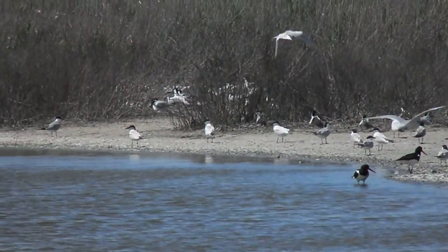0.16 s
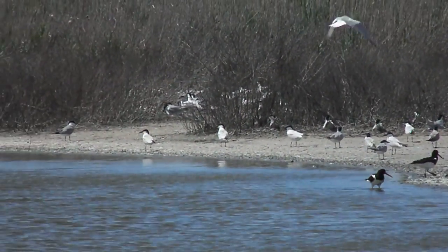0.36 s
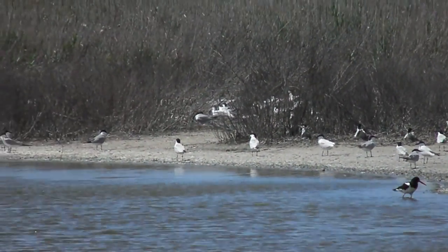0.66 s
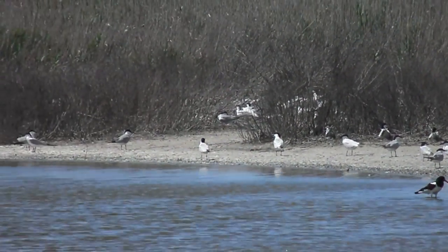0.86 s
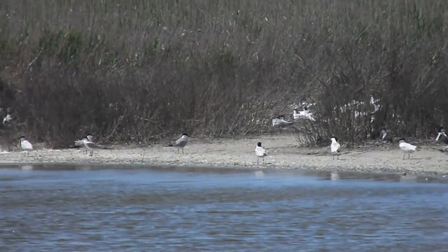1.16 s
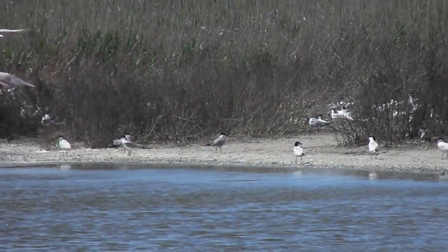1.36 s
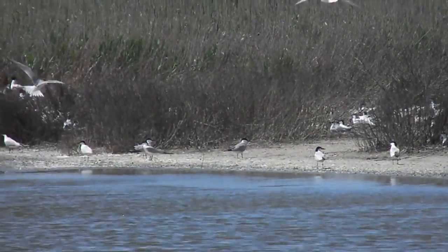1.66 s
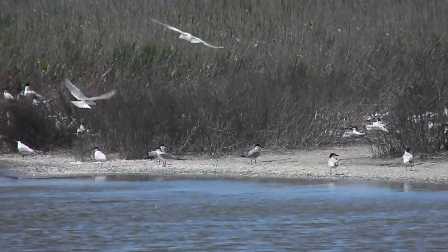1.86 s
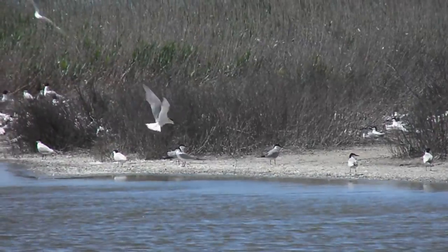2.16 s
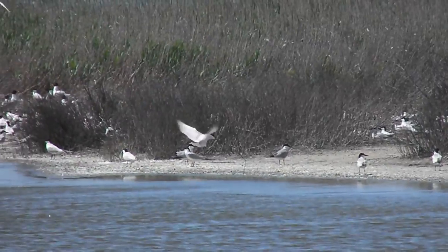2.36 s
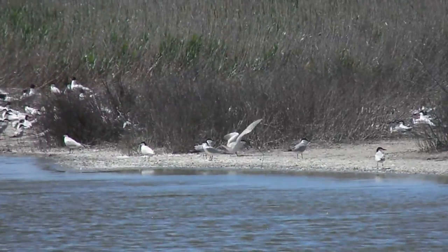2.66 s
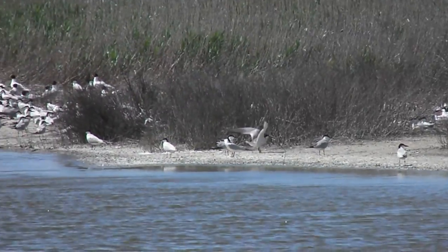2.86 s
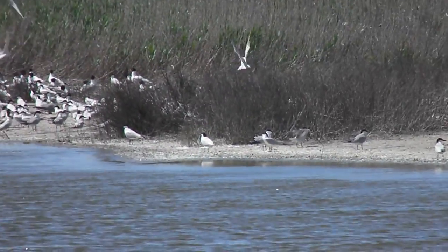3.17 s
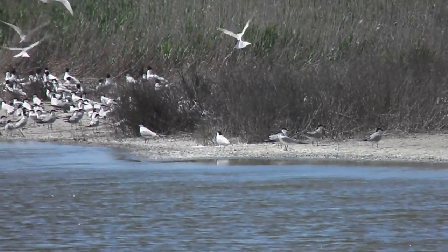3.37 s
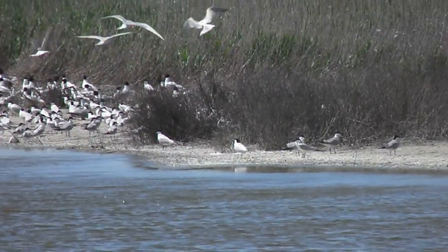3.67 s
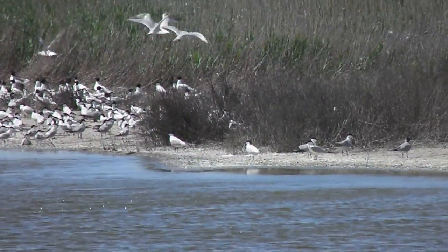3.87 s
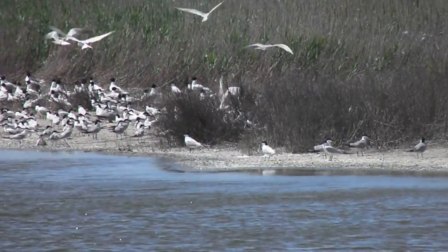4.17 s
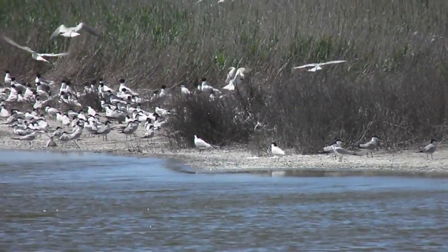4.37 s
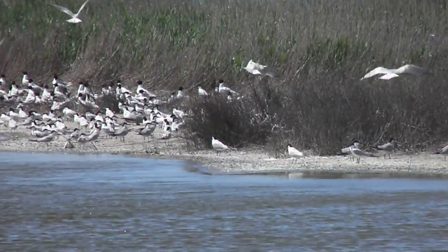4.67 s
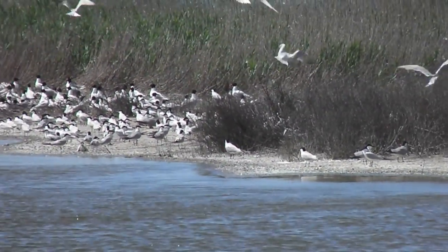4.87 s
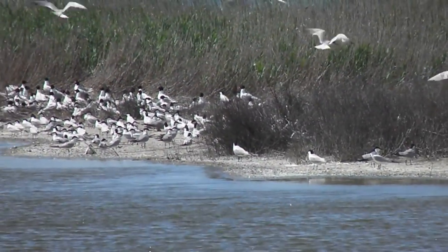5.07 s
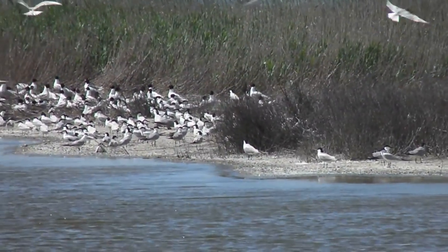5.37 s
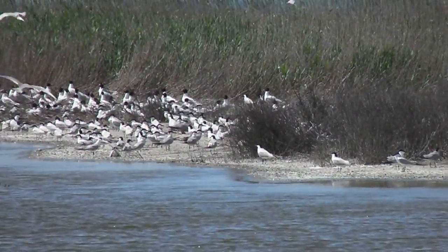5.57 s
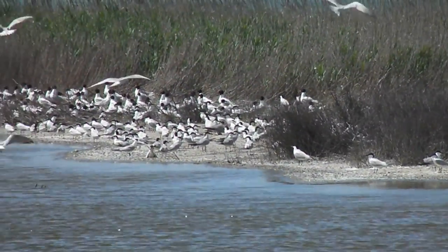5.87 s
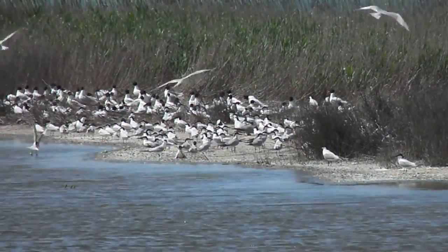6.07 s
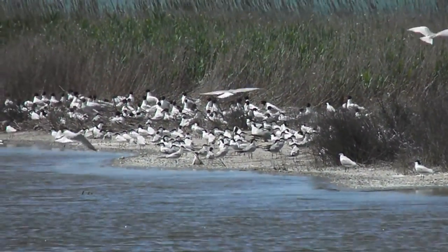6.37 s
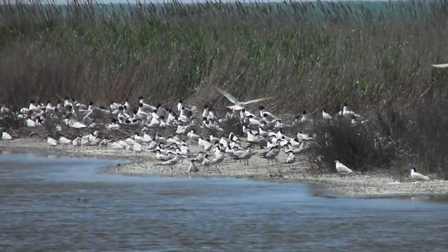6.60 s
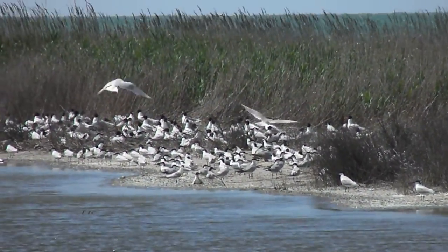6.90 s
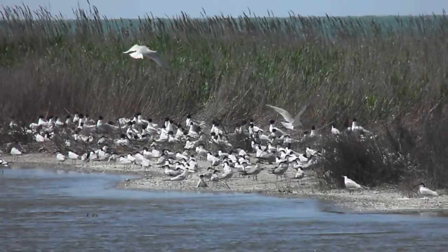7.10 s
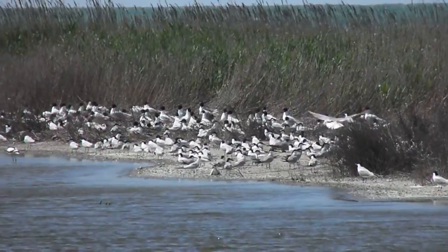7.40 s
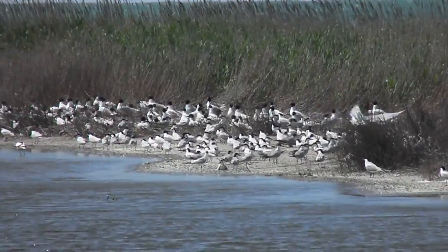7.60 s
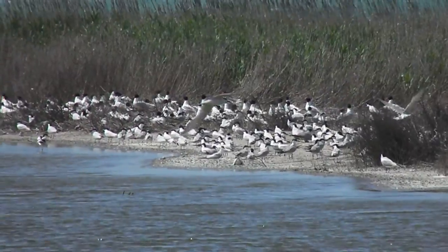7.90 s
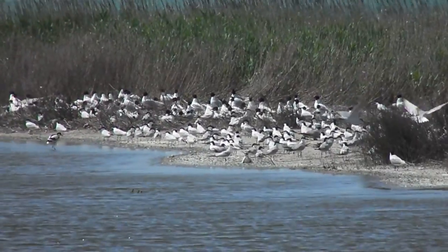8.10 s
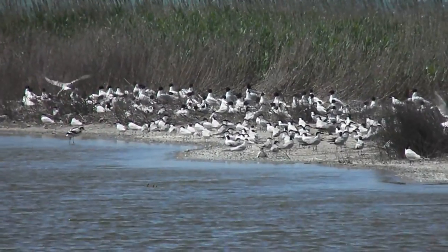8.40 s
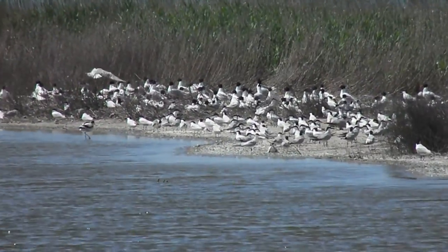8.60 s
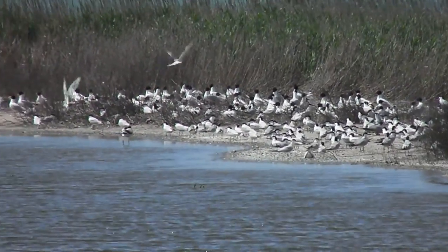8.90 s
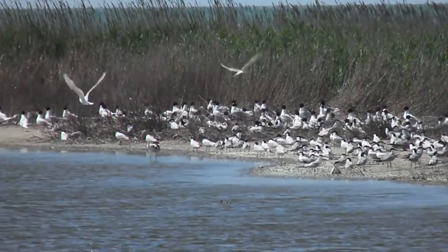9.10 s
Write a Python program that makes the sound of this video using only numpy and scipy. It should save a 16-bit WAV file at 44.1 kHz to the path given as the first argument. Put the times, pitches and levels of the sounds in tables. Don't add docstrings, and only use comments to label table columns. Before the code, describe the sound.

Piping waders, yelping gulls and hundreds of blurred distant birds call nonstop while wind rumbles and pops hard against a small camera microphone.

```python
import sys
import numpy as np
from scipy import signal
from scipy.fft import rfft, irfft, next_fast_len
from scipy.io import wavfile
from scipy.ndimage import uniform_filter1d

SR = 44100
rng = np.random.default_rng(int(sys.argv[2]) if len(sys.argv) > 2 else 0)


def generate_wav(sig):
    pcm = np.round(np.clip(np.atleast_2d(sig).T, -1, 1) * 32767).astype(np.int16)
    wavfile.write(sys.argv[1], SR, pcm)


def linear_from_db(decibels):
    return 10 ** (np.asarray(decibels, float) / 20)


N = 407925


def evened(x):
    return x / np.sqrt(np.mean(x ** 2) + 1e-20)


def read(points, hz):
    f, value = np.transpose(points)
    return np.interp(np.log(hz + 1), np.log(f + 1), value)


def add(mix, s, sound):
    part = mix[max(round(s * SR), 0):][:len(sound)]
    part += sound[:len(part)]


def colour(x, points):
    size = next_fast_len(len(x))
    gain = linear_from_db(read(points, np.fft.rfftfreq(size, 1 / SR)))
    return irfft(rfft(x, size) * gain, size)[:len(x)]


def drift(size, span):
    return evened(uniform_filter1d(uniform_filter1d(rng.standard_normal(size), span), span))


def eddies():
    # t/s, peak level/dB
    singles = [(.078, -8), (.153, -8), (.5, -7), (.522, -11), (.565, -8.5), (1.24, -10.5), (1.682, -4.5),
               (1.723, -6), (2.781, -7), (3.513, -7), (3.596, -7.5), (3.67, -6.5), (3.716, -9), (3.779, -7.5),
               (3.941, -10), (4.677, -15), (4.689, -7), (5.255, -8), (5.278, -8), (5.414, -9), (5.483, -3.5),
               (5.515, -9), (6.8, -3), (6.811, -15), (6.84, -6.5), (7.278, -4.5), (7.334, -5.5),
               (7.347, -9.5), (8.171, -7), (8.949, -9.5),
               (0.042, -16), (0.055, -11.5), (.186, -12.5), (0.439, -12.5), (.612, -16.5), (.662, -14.5),
             (1.125, -17.5), (2.036, -13), (2.382, -11), (2.464, -10.5), (2.96, -14.5), (3.104, -14.5),
             (3.263, -11.5), (3.293, -13), (4.04, -15), (4.116, -14.5), (5.796, -15), (6.683, -13.5),
             (6.898, -13), (7.164, -16.5), (7.29, -9), (7.586, -12), (7.643, -15), (7.754, -14),
             (7.79, -14), (8.069, -11), (8.235, -14), (8.578, -11.5), (8.828, -12), (1.743, -16.5),
             (6.772, -20), (6.883, -20), (6.933, -20), (7.21, -17.5), (.093, -20.5), (.132, -19),
             (.424, -17.5), (.448, -18), (.58, -13), (.59, -15), (2.936, -19), (0.708, -22), (1.102, -26),
             (1.499, -21), (1.664, -10.5), (1.796, -15.5), (1.98, -21), (2.55, -17.5), (2.56, -17),
             (3.064, -16), (3.444, -12), (3.468, -12.5), (3.496, -9.5), (3.579, -12.5), (3.887, -21),
             (3.967, -17.5), (5.33, -13), (5.44, -13), (6.129, -18.5), (6.582, -18.5), (7.118, -19.5),
             (7.52, -20.5), (7.902, -19.5), (8.979, -17.5)]
    # t/s, length/s, peak level/dB
    flurries = [(0.481, .03, -16), (0.541, .03, -9.5), (1.611, .035, -13.5), (2.064, .045, -14.5),
                (3.299, .035, -17), (3.546, .04, -18.5), (3.626, .135, -14), (3.915, .055, -15),
                (5.217, .03, -13.5), (5.305, .01, -11.5), (5.374, .04, -13), (6.664, .06, -16.5),
                (8.159, .035, -10.5), (8.59, .06, -15.5), (9.089, .075, -16)]
    gap_s, scatter, spread_db = .02, .4, 2.
    rows = singles
    order = np.arange(8)
    for (s, length, db), (late, loud) in zip(flurries, rng.standard_normal((len(flurries), 2, 8))):
        after = gap_s * (order + scatter * np.clip(late, -1, 1) * (order > 0))
        rows = rows + [(s + a, db + spread_db * b) for a, b in zip(after, loud) if a < length]
    return rows


def gustiness(pops):
    train = np.zeros(N)
    train[(np.transpose(pops)[0] * SR).astype(int)] = SR / 14
    smooth = uniform_filter1d(uniform_filter1d(train, SR // 7), SR // 14)
    return np.minimum(smooth, 1)


def wind(pops, ride_db):
    # t/s, level/dB
    breeze = [(0.0, -42.5), (0.15, -40.5), (1.05, -40.5), (1.3, -36), (1.9, -37), (2.42, -35),
              (2.78, -39.5), (3.68, -35), (4.4, -42), (4.8, -36.5), (5.309, -37.5), (6.34, -37.5),
              (6.83, -36.5), (8.32, -37.5), (9.25, -35.5)]
    # f/Hz, level/dB
    rumble = [(20, -40), (40, -10.5), (93, -5), (250, 0.5), (600, -11.5), (1200, -30), (3000, -55),
              (15000, -43.5)]
    # f/Hz, level/dB
    gust = [(30, -29), (100, -14), (206, 0.5), (458, 1), (1000, -15.5), (1890, -30.5), (3000, -47.5),
            (8000, -65.5), (15000, -74)]
    ride = .75
    strength_db = np.interp(np.arange(N) / SR, *np.transpose(breeze)) + 6.3 * gustiness(pops)
    lumpy_noise = rng.standard_normal(N) * linear_from_db(5.2 * drift(N, 200))
    mix = linear_from_db(strength_db + .5) * evened(colour(lumpy_noise, rumble))
    t = np.arange(-.02, .03, 1 / SR)
    wake = np.exp(-(t / np.where(t < 0, .005, .012)) ** 2)
    shape = np.exp(-(t / .0013) ** 2) + .28 * wake
    fade = signal.windows.tukey(len(t), .2)
    for s, db in pops:
        tilt = .36 * (db + 15)
        tilted = [(f, level + tilt * np.log2(f / 450)) for f, level in gust]
        pop = colour(shape * rng.standard_normal(len(t)), tilted)
        peak = linear_from_db(db - .05 - ride * ride_db[round(s * SR)])
        add(mix, s + t[0], peak * pop / abs(pop).max() * fade)
    return mix * linear_from_db(ride * ride_db)


def gain_db(pops):
    # t/s, gain lost/dB
    shoves = [(.091, 6.5), (.167, 6), (.195, 9.5), (.455, 15.5), (.568, 20.5), (2.1, 13.5), (2.788, 8),
              (2.956, 10.5), (3.103, 11.5), (3.212, 18.5), (3.455, 9.5), (3.689, 22.5), (3.808, 17.5),
              (3.944, 14.5), (5.293, 19), (5.421, 6), (6.633, 10), (6.743, 21.5), (6.919, 10),
              (7.135, 10.5), (7.198, 13), (7.649, 8.5), (7.734, 18), (7.84, 8.5), (7.925, 10.5),
              (8.247, 12.5), (8.596, 18.5), (8.987, 4), (9.057, 10.5), (9.154, 2)]
    trip_db, squeeze, react_s, recover_db_per_s = -24, .71, .0047, 114.5
    lost = np.zeros(N)
    drops = [(s + react_s, squeeze * (db - trip_db)) for s, db in pops]
    for s, db in [*shoves, *drops]:
        lost[round(s * SR)] = db
    climb = np.arange(N) * recover_db_per_s / SR
    return -uniform_filter1d(np.maximum.accumulate(lost + climb) - climb, size=120)


def shore(x, t60=.25):
    t = np.arange(SR // 3) / SR
    sparse = rng.standard_normal(len(t)) * (rng.random(len(t)) < .05)
    taps = sparse * linear_from_db(-60 * t / t60) * (t > .004)
    return signal.oaconvolve(x, taps / np.linalg.norm(taps))[:N]


def gull(s, rise, first_hz, top_hz, db, throat_hz, rough=.2):
    # f/Hz, level/dB
    throat = [(800, -7), (1400, -3), (2400, 0), (5300, -3), (7000, -10), (10000, -26), (13000, -50)]
    onset_s, fall_s, fall_to = .012, .0181, .7
    end = rise + fall_s
    t = np.arange(-onset_s, end, 1 / SR)
    hz = np.interp(t, [-onset_s, 0, rise, rise + fall_s / 3, end],
                   [.88 * first_hz, first_hz, top_hz, top_hz * .97, fall_to * top_hz])
    hz = uniform_filter1d(hz, 350, mode="nearest") * (1 + .004 * drift(len(t), 300))
    k = np.arange(1, 12)[:, None]
    near_db = np.maximum(-7 * ((k * hz / throat_hz - 1) / .4) ** 2, -27)
    levels = linear_from_db(read(throat, k * top_hz) + near_db + 1.8 * rng.standard_normal(k.shape))
    turns = k * np.cumsum(hz) / SR + rng.random(k.shape)
    cry = evened((levels * np.sin(2 * np.pi * turns)).sum(0))
    cry = cry * (1 + rough * drift(len(t), 40)) * linear_from_db(1.5 * drift(len(t), 500))
    effort_db = np.interp(t, [-onset_s, 0, rise, end], [-18, -5, 1.5, -7])
    return s + t[0], linear_from_db(db + effort_db) * cry * signal.windows.tukey(len(t), .15)


def colony(count=360):
    # f/Hz, level/dB
    blur_curve = [(400, -8), (820, 3), (1160, -6.5), (1630, -4.5), (2480, 0), (3310, -12.5), (4780, -7),
                  (7000, -14.5), (10000, -20), (16000, -32)]
    mix = np.zeros(N)
    for when, long, high, climb, near, deep, tern in rng.random((count, 7)):
        hz = (640 + 320 * high) * (2 if tern > .8 else 1)
        rise = .008 + .035 * long ** 2
        top_hz = hz * (.94 + .22 * climb)
        throat_hz = 1900 + 1700 * deep ** 2
        add(mix, *gull(when * N / SR, rise, hz, top_hz, 4 * near, throat_hz, .15 + .3 * long))
    cries = evened(mix + linear_from_db(-11) * shore(mix, .2))
    blur = evened(colour(rng.standard_normal(N), blur_curve)) * linear_from_db(2.5 * drift(N, 700))
    return linear_from_db(-42) * (cries + linear_from_db(-1.5) * blur)


def slur(rows):
    s, hz, db = np.transpose(rows)
    t = np.arange(s[0], s[-1], 1 / SR)
    turn = 2 * np.pi * np.cumsum(uniform_filter1d(np.interp(t, s, hz), 200)) / SR
    tone = np.sin(turn) + linear_from_db(-17) * np.sin(2 * turn)
    level = linear_from_db(np.interp(t, s, db) + 1.7 * drift(len(t), 80))
    return s[0], level * tone * signal.windows.tukey(len(t), .15)


def buzzes(pops):
    # f/Hz, level/dB
    buzz_curve = [(2400, -4), (4800, 4), (9600, 0), (14400, -9)]
    t = np.arange(0, .004, 1 / SR)
    mix = np.zeros(N)
    lines = 2400 * np.arange(1, 7)[:, None]
    fade = signal.windows.tukey(len(t), .6)
    for (s, db), (late, loud, *phases) in zip(pops, rng.random((150, 8))):
        waves = np.sin(2 * np.pi * (lines * t + np.c_[phases]))
        buzz = (linear_from_db(read(buzz_curve, lines)) * waves).sum(0)
        add(mix, s + .013 * late, linear_from_db(-72 + 26 * loud ** 2) * buzz * fade)
    return mix


def kip(s, db):
    t = np.arange(0, .055, 1 / SR)
    hz = 2384 * np.interp(t, [0, .006, .03, .055], [.85, 1, .98, .9])
    turn = 2 * np.pi * np.cumsum(hz) / SR
    tone = np.sin(turn) + np.sin(2 * turn) + linear_from_db(-10) * np.sin(3 * turn)
    effort_db = np.interp(t, [0, .008, .03, .055], [31, 26, 18, 5.4])
    return s, linear_from_db(db + effort_db) * tone * signal.windows.tukey(len(t), .2)


def peep(s, top_hz, db, over_db):
    # t/s from its highest pitch, pitch factor, tone level/dB, overtone level/dB
    course = [
        (-.016, .7, -11, -28),
        (-.009, .93, -3.5, 4.5),
        (-.006, .985, -1.5, 0.5),
        (0, 1, 1, 6),
        (.006, .965, 5, -0.5),
        (.014, .86, 2, -16),
        (0.025, .77, 0, -22),
        (.042, .68, -8.5, -53),
        (.056, .66, -26, -65),
    ]
    late_s = .003
    when, *columns = np.transpose(course)
    t = np.arange(when[0], when[-1], 1 / SR)
    factor, tone_db, bright_db = (uniform_filter1d(np.interp(t, when, c), 120) for c in columns)
    turn = 2 * np.pi * np.cumsum(top_hz * factor) / SR
    third = linear_from_db(-9 - .76 * bright_db) * np.sin(3 * turn)
    overtones = np.sin(2 * turn) + third + linear_from_db(-21) * np.sin(4 * turn)
    halves = linear_from_db(-5) * np.sin(turn * 3 / 2) + np.sin(turn * 5 / 2)
    halves = linear_from_db(-3) * halves * np.exp(-((t + .007) / .005) ** 2)
    breath = np.diff(uniform_filter1d(rng.standard_normal(len(t) + 1), 5))
    breath = breath * np.exp(-((t + .016) / .003) ** 2)
    flutter = linear_from_db(1.4 * drift(len(t), 60))
    sound = linear_from_db(tone_db) * np.sin(turn) + linear_from_db(over_db + bright_db) * (overtones + halves)
    sound = sound + linear_from_db(-6) * breath
    return s + when[0] + late_s, linear_from_db(db + 5) * flutter * sound


def rasp(s, length, per_s, db):
    # f/Hz, level/dB
    scrape = [(1400, -20), (2100, -1), (2800, -1.5), (3400, -8), (5000, -13.5), (8000, -30.5)]
    t = np.arange(0, length, 1 / SR)
    pulses = np.exp(-((per_s * t + .08 * drift(len(t), 300)) % 1) / .35)
    sound = evened(colour(pulses * rng.standard_normal(len(t)), scrape))
    return s, linear_from_db(db) * sound * signal.windows.tukey(len(t), .4)


def trill(s, length, first_hz, last_hz, per_s, db):
    t = np.arange(0, length, 1 / SR)
    notes = np.clip(np.sin(2 * np.pi * per_s * t) + .3, 0, 1)
    turn = 2 * np.pi * np.cumsum(np.linspace(first_hz, last_hz, len(t))) / SR
    return s, linear_from_db(db + 2 * drift(len(t), 900)) * notes * np.sin(turn) * signal.windows.tukey(len(t), .2)


def near_birds():
    # t/s, f/Hz, level/dB
    slurs = [
        [(0, 2800, -25.5), (.035, 2046, -41.5), (.1, 2740, -35.5), (.125, 2360, -43)],
        [(.43, 2350, -45), (.455, 2300, -46), (.485, 1980, -44)],
        [(.505, 3150, -42), (.525, 3280, -46), (.56, 3080, -43), (.6, 3300, -45)],
        [(1.825, 2500, -38), (1.845, 2342, -34), (1.87, 1970, -38)],
        [(1.4, 3250, -26), (1.425, 2480, -25), (1.47, 2290, -28), (1.54, 2204, -30)],
        [(5.49, 2580, -27), (5.51, 2400, -37), (5.555, 2240, -34)],
        [(6.415, 3150, -29), (6.43, 3215, -37), (6.465, 2400, -25.5)],
        [(2.865, 2214, -31), (2.877, 2470, -37), (2.928, 1510, -45)],
        [(2.8, 2230, -42), (2.814, 2750, -40), (2.85, 2050, -44)],
        [(2.51, 2260, -40), (2.525, 2560, -32), (2.562, 2140, -50)],
        [(2.6, 1575, -43), (2.65, 1950, -29), (2.69, 2130, -38)],
        [(4.78, 1870, -44), (4.797, 2460, -28.5), (4.835, 1800, -38)],
        [(4.445, 2800, -43), (4.47, 3060, -32), (4.492, 2800, -36)],
        [(6.225, 2420, -49), (6.315, 2738, -53), (6.33, 2400, -46)],
        [(.925, 2590, -32), (.97, 2400, -32), (1.0, 2140, -24)],
        [(8.24, 2490, -53), (8.285, 2730, -32), (8.3, 2560, -34)],
        [(8.27, 1539, -49), (8.32, 2103, -27), (8.337, 1786, -40)],
    ]
    # t/s, level/dB
    kips = [
        (.118, -64),
        (.675, -59.5),
        (1.228, -59),
        (1.814, -63.5),
        (2.368, -66),
        (3.49, -69),
        (8.768, -69),
    ]
    # t/s of highest pitch, highest f/Hz, level/dB, overtone level/dB
    peeps = [(0.279, 3450, -23, -21), (1.131, 3450, -29, -13), (1.365, 3434, -29, -12),
             (1.628, 3450, -38.5, -1), (1.923, 3430, -28, -11.5), (2.202, 3440, -36.5, -7),
             (4.403, 3500, -26.5, -11.5), (4.975, 3460, -27, -15.5), (5.274, 3500, -36.5, -7.5),
             (5.571, 3480, -29, -9), (5.827, 3510, -35.5, -13.5), (6.091, 3490, -30, -4),
             (6.354, 3430, -32, -8), (6.608, 3520, -36, -4.5), (6.656, 3310, -42, -10),
             (6.852, 3575, -43, -15), (7.094, 3510, -37, -4), (7.337, 3480, -34, -6.5),
             (7.581, 3440, -35, -13.5), (7.824, 3420, -40.5, -13), (8.08, 3484, -32, -13),
             (8.328, 3513, -23.5, -9.5), (8.577, 3487, -27.5, -6.5), (9.133, 3380, -38.5, -11),
             (.607, 3380, -38.5, -15), (0.882, 3407, -27.5, -11), (2.499, 3400, -45.5, -3.5),
                 (2.817, 3240, -38.5, -16), (3.136, 3192, -30.5, -16), (3.454, 3270, -37.5, -34),
                 (3.774, 3350, -40.5, -13), (4.107, 3270, -30, -20.5), (4.139, 3367, -40, -14),
                 (4.351, 3140, -32, -18), (4.678, 3150, -34, -12), (4.684, 3490, -33.5, -28),
                 (5.722, 3350, -37, -6.5), (5.935, 3260, -36.5, -7), (6.176, 3320, -35, -9),
                 (7.399, 3250, -42, -8.5), (7.957, 3280, -41, -19), (8.464, 3300, -31, -8),
                 (8.697, 3196, -31, -17), (8.856, 3274, -27, -10), (8.976, 3284, -41.5, -5.5)]
    # t/s, length/s, pulses per s, level/dB
    rasps = [(.305, 0.057, 90, -35), (6, .055, 77, -33.5), (5.63, .07, 65, -37), (5.2, .045, 120, -31),
             (8.54, 0.0417, 77, -29), (8.42, .04, 110, -33), (7.1, .05, 90, -36)]
    # t/s, length/s, first f/Hz, last f/Hz, notes per s, level/dB
    trills = [
        (1.157, 0.63, 2730, 2960, 63, -32.5),
        (2.655, 0.128, 3650, 3620, 44, -38),
        (5.068, 0.49, 2875, 2950, 49, -39.5),
    ]
    # t/s, length of the rise/s, top f/Hz, level/dB
    wails = [(1.975, .075, 1730, -39), (2.898, 0.096, 1720, -43.5), (6.225, 0.068, 1515, -43),
             (6.376, 0.054, 910, -29), (0.8, .065, 1670, -42.5), (4.906, 0.053, 1600, -33),
             (8.428, .012, 1835, -34), (8.476, .024, 1610, -36.5), (10, .012, 1840, -29.5),
             (.635, .055, 1680, -47)]
    mutters = [(1.76, 0.043, 880, -39), (2.13, 0.051, 848, -37), (2.293, 0.013, 840, -28.5),
               (4.42, 0.019, 810, -36), (4.495, 0.019, 820, -34), (2.96, 0.029, 827, -42),
               (3.0, .045, 846, -31), (3.08, .048, 928, -35.5), (4.04, 0.09, 795, -38.5),
               (4.19, .025, 830, -31), (4.285, 0.066, 931, -29.5), (4.535, 0.029, 888, -31),
               (5.612, .012, 980, -36), (5.697, 0.016, 961, -26.5), (5.98, 0.083, 828, -42)]
    yaps = [(2.205, .02, 865, -37), (2.33, 0.032, 930, -37), (2.602, .017, 920, -36),
            (2.652, .022, 950, -34.5), (2.7, 0.033, 905, -33), (2.865, .012, 815, -35),
            (5.845, .05, 930, -39), (8.385, .014, 845, -32)]
    yelps = [(1.489, 0.024, 864, -34.5), (2.021, 0.0086, 860, -31.5), (4.19, 0.011, 918, -47),
             (6.495, 0.013, 878, -31), (6.565, 0.015, 770, -34.5), (6.648, 0.0099, 748, -39),
             (7.185, .035, 930, -50), (7.07, 0.034, 963, -42), (7.43, .048, 885, -37.5)]
    shrieks = [
        (6.945, .065, 940, -40),
        (1.375, 0.051, 1022, -39),
        (3.239, 0.063, 1003, -37),
        (3.355, 0.042, 916, -33),
        (.312, 0.018, 1100, -38),
    ]
    mix = np.zeros(N)
    for voice, rows in ((peep, peeps), (kip, kips), (trill, trills), (rasp, rasps)):
        for row in rows:
            add(mix, *voice(*row))
    for s, rise, top_hz, db in wails:
        add(mix, *gull(s, rise, top_hz * .95, top_hz, db, 4140))
    for rows, throat_hz in ((mutters, 2070), (yaps, 2500), (yelps, 3150), (shrieks, 4700)):
        for s, rise, top_hz, db in rows:
            first_hz = top_hz * (.93 - 1.2 * rise)
            add(mix, *gull(s, rise, first_hz, top_hz, db, throat_hz))
    for rows in slurs:
        add(mix, *slur(rows))
    return mix + linear_from_db(-16) * shore(mix, .13)


def scene():
    # t/s, level/dB
    clamour = [(0, 1), (.35, 2.5), (0.799, 6.5), (1.5, 5), (2.0, 6.5), (2.5, 2.5), (3.049, 5.5), (3.4, 2),
               (3.7, 1.5), (4.2, 6), (5.0, 6.5), (5.3, -1.5), (5.749, 2.5), (6.4, 6), (7.0, 3), (7.7, -2.5),
               (8.5, 8), (9.25, -4.5)]
    pops = eddies()
    ride_db = gain_db(pops)
    clamour_db = np.interp(np.arange(N) / SR, *np.transpose(clamour))
    far = colony() * linear_from_db(ride_db + clamour_db)
    near = (near_birds() + buzzes(pops)) * linear_from_db(.55 * ride_db + 1.5)
    return (near + far + wind(pops, ride_db))[None]


def top_cut(x):
    return signal.sosfilt(signal.butter(12, 16490, fs=SR, output="sos"), x)


def record(dry):
    no_bass = signal.sosfilt(signal.butter(2, 45, "high", fs=SR, output="sos"), dry)
    b, a = signal.iirnotch(7810, 40., SR)
    notched = signal.lfilter(b, a, no_bass)
    edge = signal.firwin(401, 15850, window=("kaiser", 8), fs=SR)
    finished = signal.oaconvolve(notched, edge[None], "same")
    return top_cut(finished)


dry = scene()
out = record(dry)
generate_wav(out)
```